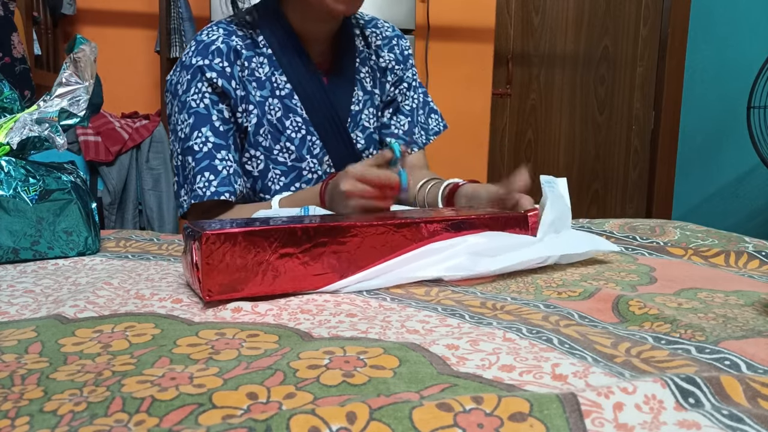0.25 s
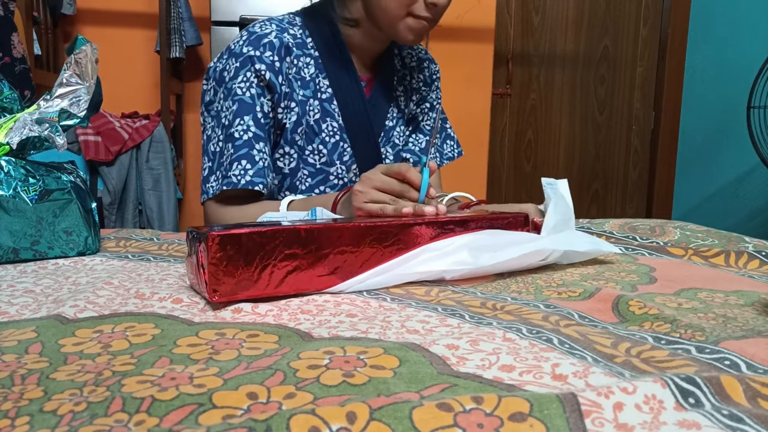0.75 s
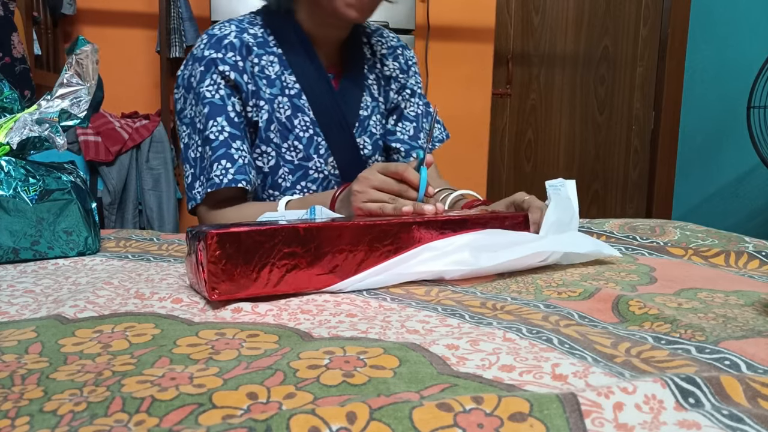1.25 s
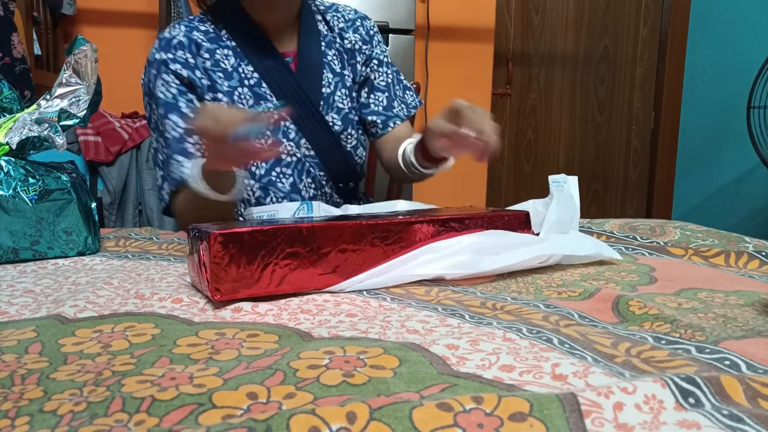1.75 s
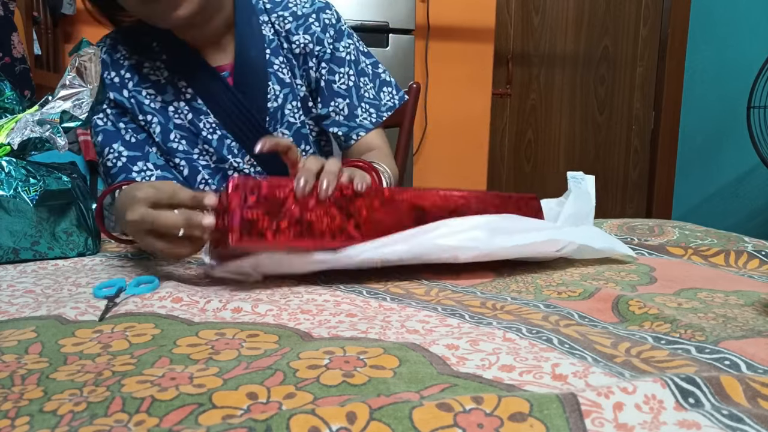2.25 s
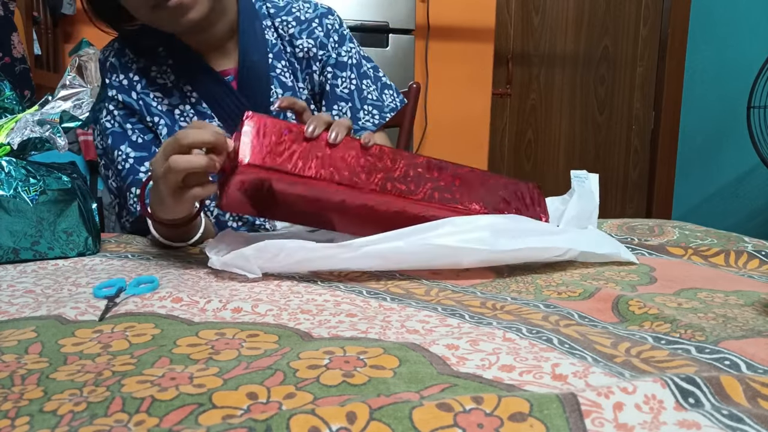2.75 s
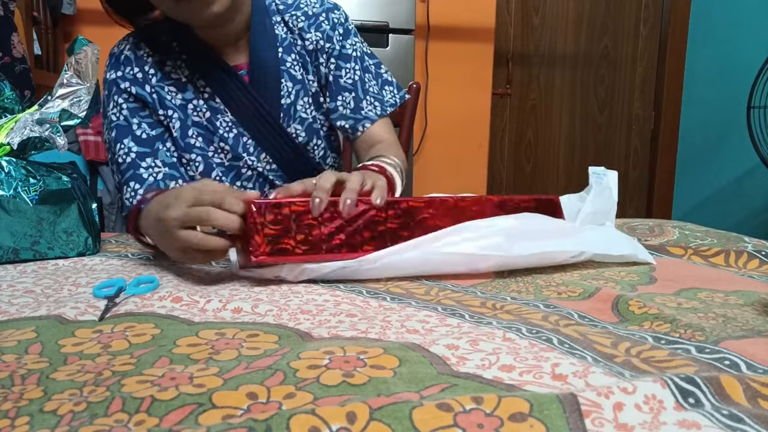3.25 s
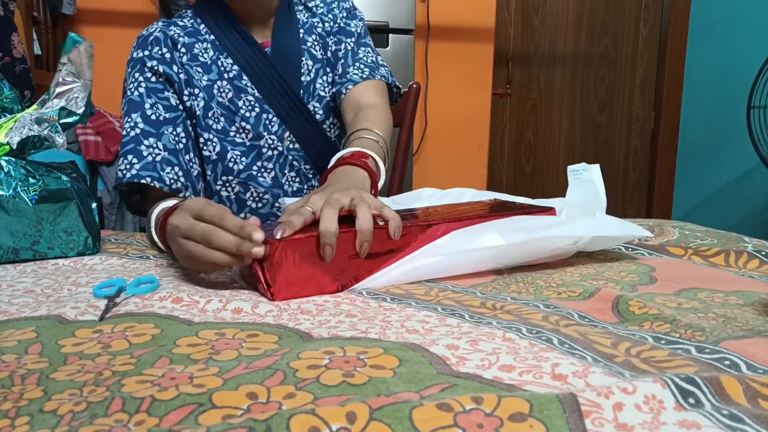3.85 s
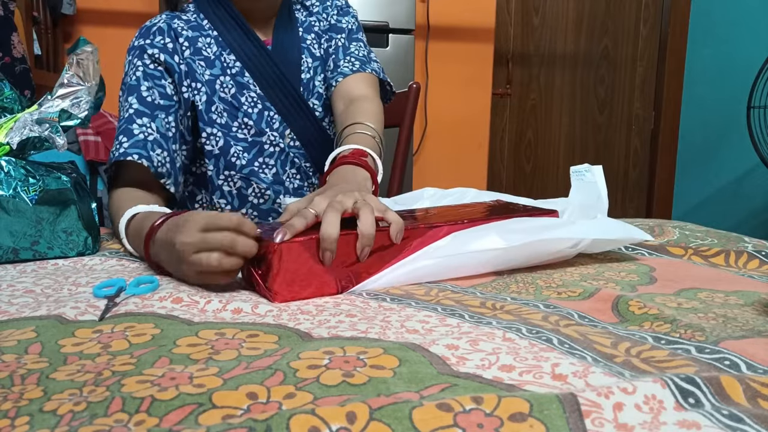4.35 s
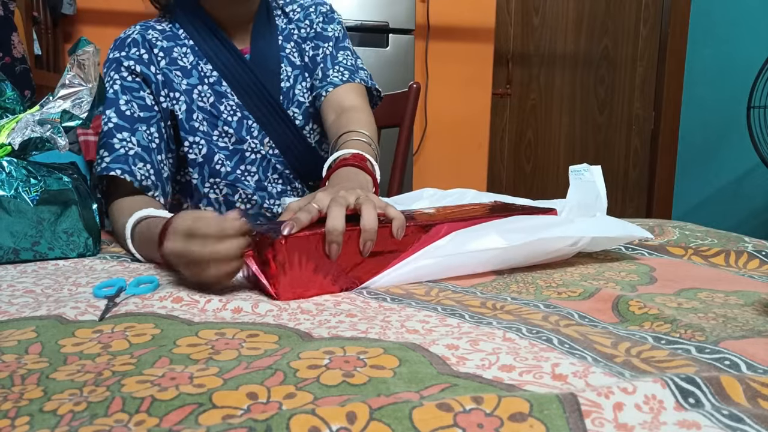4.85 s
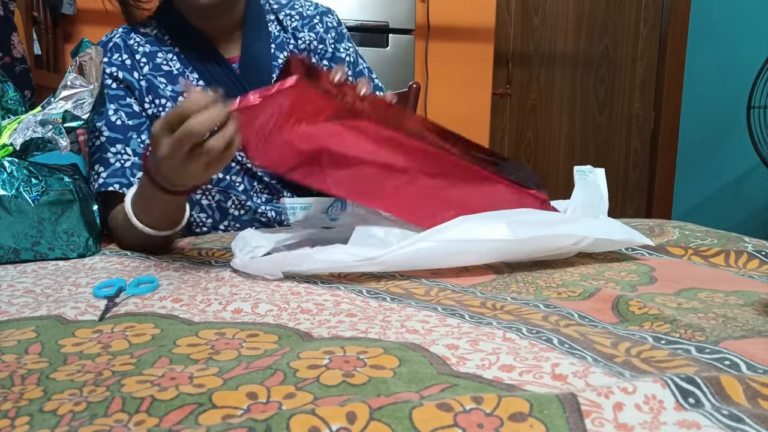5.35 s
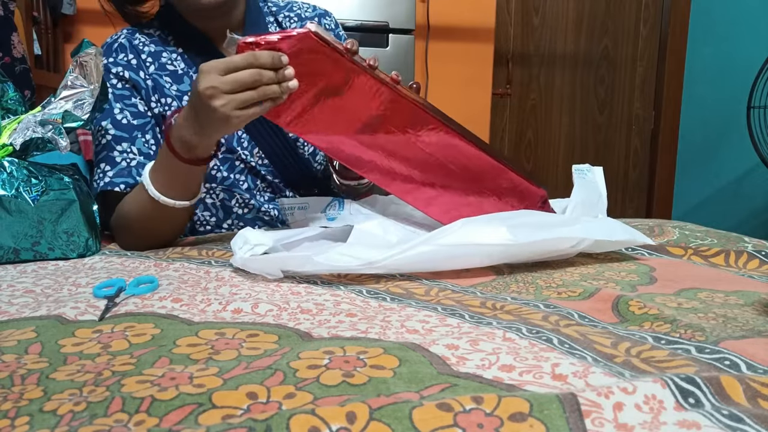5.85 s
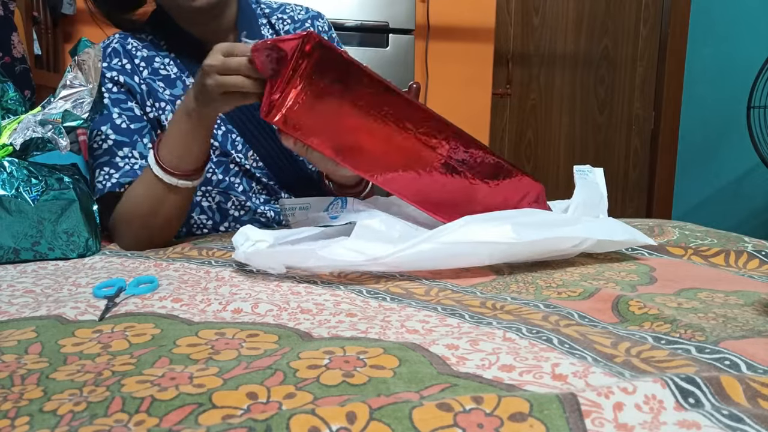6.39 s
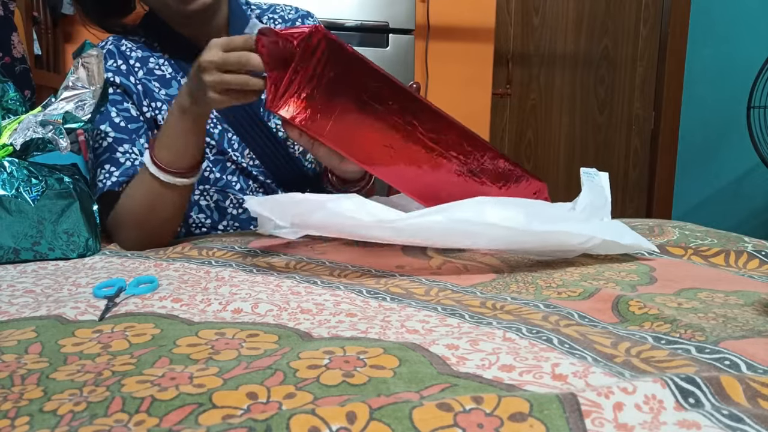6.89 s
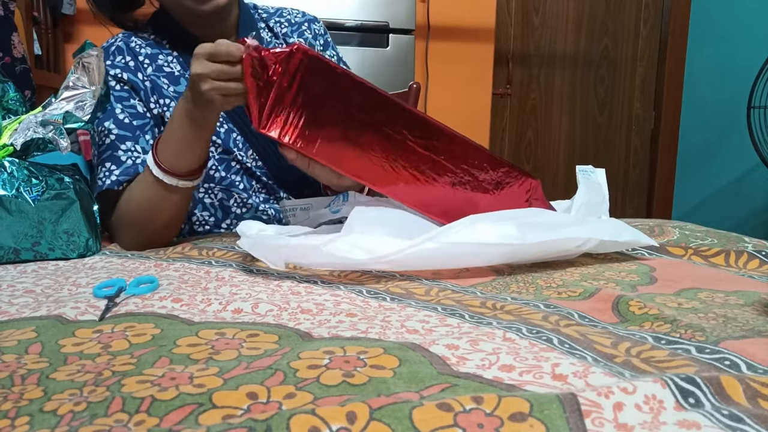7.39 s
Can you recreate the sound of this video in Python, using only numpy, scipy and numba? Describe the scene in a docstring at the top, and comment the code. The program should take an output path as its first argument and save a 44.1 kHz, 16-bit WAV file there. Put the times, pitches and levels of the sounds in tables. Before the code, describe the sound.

In a small room, someone unwraps a cardboard box covered in foil paper, close to the microphone. First come scissor snips and crinkling, then faint rustles, then sharp snaps of tape and foil and a longer run of crackly peeling. The box gives light hollow knocks as it is handled. Underneath, a fan hums steadily and its moving air buffets the microphone with soft, uneven thumps.

```python
"""Foil gift wrap rustles and snaps as it is snipped, picked at and peeled off a hollow cardboard box.
Each crease that buckles radiates a click; thousands merge into the rustle, and blows excite the damped
modes of the box in soft knocks. The box lies on a bed in a small room, a metre from a phone. A fan hums,
and the turbulence of its draught buffets the two microphone ports (0 left, 1 right)."""
import sys
import numpy as np
from scipy import signal
from scipy.fft import rfft, irfft, next_fast_len
from scipy.io import wavfile
from scipy.ndimage import uniform_filter1d
from numba import njit

SR = 44100
rng = np.random.default_rng(int(sys.argv[2]) if len(sys.argv) > 2 else 0)


def master(y):
    """Save y as 16-bit WAV."""
    cut = np.clip(np.atleast_2d(y).T, -1, 1)
    pcm = np.round(cut * 32767)  # scale
    wavfile.write(sys.argv[1], SR, pcm.astype(np.int16))


N = 336218


def undb(db):
    """Amplitude ratio of a level in decibels."""
    return 10 ** (np.asarray(db) / 20)


def unit(x):
    """Normalisation to an rms of 1."""
    return x / np.sqrt(np.mean(x ** 2))


def curves(table):
    """Linear interpolation of a time table's columns, one value a sample."""
    times, *columns = np.transpose(table)
    return [np.interp(np.arange(N) / SR, times, column) for column in columns]


def over_pitch(table, hz):
    """Interpolation of a (frequency_hz, value) table on a logarithmic frequency axis."""
    knots_hz, values = np.transpose(table)
    return np.interp(np.log(np.maximum(hz, 1)), np.log(knots_hz), values)


def add(out, sound, start_s):
    """Superposition of a short sound on a longer one."""
    i = max(int(start_s * SR), 0)
    n = min(len(sound), N - i)
    out[i:i + n] += sound[:n]


def walk(rate_hz):
    """Random modulation: held Gaussian values, smoothed twice."""
    hold = int(SR / rate_hz)
    steps = np.repeat(rng.standard_normal(N // hold + 1), hold)
    return 0.77 * uniform_filter1d(uniform_filter1d(steps, hold), hold)[:N]


@njit
def svf(x, hz, damping):
    """Second-order resonator with a moving centre and damping 1/Q: low, band and high outputs."""
    y, band_state, low_state = np.empty((3, len(x))), 0., 0.
    for i in range(len(x)):
        g = np.tan(np.pi * hz[i] / SR)
        band = (band_state + g * (x[i] - low_state)) / (1 + g * (g + damping))
        low = low_state + g * band
        band_state, low_state = 2 * band - band_state, 2 * low - low_state
        y[0, i], y[1, i], y[2, i] = low, damping * band, x[i] - damping * band - low
    return y


def tail(start_s, decay):
    """Diffuse impulse responses: decaying noise of unit energy, uncorrelated between the ports."""
    t = np.arange(12000) / SR
    noise = rng.standard_normal((2, len(t))) * (t > start_s) * decay(t)
    return noise / np.sqrt(np.sum(noise ** 2, axis=1, keepdims=True))


def spread(x, tails):
    """Convolution of one sound with an impulse response for each port."""
    return signal.fftconvolve(x[None], tails, axes=1)[:, :N]


def fan_hum(level_db=-59.5):
    """Partially coherent noise of fan and house: both ports share the low middle, which wavers."""
    # noise spectrum: frequency_hz, relative_density_db
    spectrum = [(35, 4), (60, 4.5), (380, 2), (924, -12.5), (1250, -7), (2190, -10.5), (3760, -19),
                (4220, -28), (5090, -18), (7400, -30), (9300, -20), (16000, -70)]
    # likeness of the two ports: frequency_hz, coherence (0 to 1)
    likeness = [(60, 0), (290, 1), (640, 0.24), (1400, 0.24), (3000, 0), (16000, 0.6)]
    size = next_fast_len(N)
    hz = np.fft.rfftfreq(size, 1 / SR)
    coherence = np.clip(over_pitch(likeness, hz), 0, 1)
    mid, side = (rfft(rng.standard_normal(size)) * undb(over_pitch(spectrum, hz)) for _ in range(2))
    pair = np.sqrt(1 + coherence) * mid + np.sqrt(1 - coherence) * side * np.array([[1], [-1]])
    low = irfft(pair / (1 + (hz / 600) ** 4), size)[:, :N]
    hum = irfft(pair, size)[:, :N] + (undb(2.5 * walk(20)) - 1) * low
    return unit(hum) * undb(level_db + 1.1 * walk(5.5))


def gust_levels(rise_db_per_s=550, fall_db_per_s=555, calm_db=-82):
    """Envelope in dB at each port: gusts grow exponentially, hold and decay to calm."""
    # gusts of the draught: start_s, length_s, level_db, port
    gusts = [(0, 0.008, -40, 1), (0, 0.024, -43.5, 0), (0.143, 0.039, -51, 0), (0.403, 0.031, -37.5, 1),
             (0.448, .11, -45, 1), (.54, 0.084, -55, 0), (0.857, 0.23, -43, 1), (0.907, .38, -55, 0),
             (1.421, 0.19, -42.5, 1), (1.495, 0.11, -51, 0), (1.685, 0.093, -43, 1), (1.753, .03, -54, 0),
             (1.93, .11, -41.5, 1), (2.239, .03, -50, 1), (2.36, 0.092, -46.5, 1), (2.358, 0.078, -54, 0),
             (2.529, 0.044, -48, 0), (2.526, 0.04, -41.5, 1), (2.607, 0.036, -49.5, 1),
             (2.674, 0.066, -54, 1), (2.866, 0.081, -44, 1), (2.905, .08, -53, 0), (3.053, 0.076, -37, 1),
             (3.11, 0.043, -50, 0), (3.35, 0.23, -43, 1), (3.43, 0.12, -53, 0), (3.78, 0.2, -52, 1),
             (4.006, 0.42, -59.5, 0), (4.165, 0.072, -54, 1), (4.312, 0.036, -37, 1),
             (4.616, 0.042, -41, 1), (4.713, 0.045, -46, 0), (4.891, 0.3, -39, 1), (5.104, 0.28, -50.5, 0),
             (5.353, 0.035, -39.5, 1), (5.5, 0.036, -37.5, 1), (5.58, 0.14, -51.5, 1), (5.6, 0.12, -55, 0),
             (6.033, 0.3, -38.5, 1), (6.143, .03, -56, 0), (6.378, .03, -54.5, 0), (6.456, 0.14, -44, 1),
             (6.737, 0.23, -41, 1), (7.102, 0.24, -39, 1), (7.173, 0.57, -51, 0), (7.4, 0.17, -37.5, 1)]
    t = np.arange(0, N + 64, 64) / SR
    start, length, held_db, port = np.transpose(gusts)[:, :, None]
    db = held_db - rise_db_per_s * np.maximum(start - t, 0)
    db -= fall_db_per_s * np.maximum(t - start - length, 0)
    right = port[:, 0] > .5
    levels = [np.maximum(db[side].max(0), calm_db) for side in (~right, right)]
    return curves(np.transpose([t, *levels]))


def draught(eddy_cycles=0.52, flutter_db=4.0):
    """Turbulent pressure rumbles on each port alone, higher in stronger gusts; lone eddies thump."""
    # eddies striking a port: centre_s, envelope_peak_db, pitch_hz, port
    eddies = [(0.385, -21, 106, 1), (0.439, -32, 132, 1), (0.464, -19.5, 142, 1), (0.51, -28, 132, 1),
              (1.44, -17, 162, 1), (1.506, -29, 91, 0), (1.526, -34, 111, 0), (1.551, -34, 97, 0),
              (1.57, -29.5, 89.5, 0), (1.717, -26.5, 84, 1), (1.752, -33, 96, 0), (2.904, -23, 109, 1),
              (2.968, -37, 70.5, 0), (3.057, -24.5, 108, 1), (3.092, -19.5, 124, 1), (3.41, -20, 88.5, 1),
              (3.433, -22, 129, 1), (3.473, -29.5, 105, 0), (3.538, -25.5, 124, 1), (3.563, -36, 85, 0),
              (3.583, -36, 99, 0), (3.816, -28.5, 100, 1), (4.221, -34, 113, 0), (4.54, -24.5, 124, 1),
              (4.614, -21, 96.3, 1), (4.772, -23, 121, 1), (4.922, -26.5, 116, 1), (4.964, -23, 112, 1),
              (4.988, -27, 109, 1), (5.007, -28.5, 124, 1), (5.035, -16.5, 169, 1), (5.139, -27, 98, 1),
              (5.148, -29, 94, 0), (5.477, -23, 115, 1), (5.58, -25.5, 137, 1), (6.046, -25.5, 99, 1),
              (6.121, -23.5, 114, 1), (6.159, -22.5, 151, 1), (6.204, -31, 112, 1), (6.22, -22.5, 103, 1),
              (6.243, -26, 107, 1), (6.29, -18.5, 159, 1), (6.777, -23, 144, 1), (6.919, -24, 107, 1),
              (7.076, -25, 98, 1), (7.114, -30, 101, 1), (7.16, -28.5, 97.5, 1), (7.181, -33, 119, 1),
              (7.277, -19.5, 153, 1), (7.323, -32, 108, 1), (7.42, -24.5, 112, 1), (7.487, -20, 157, 1),
              (7.517, -22, 100, 1), (7.523, -39, 81, 0), (7.595, -30.5, 132, 1), (7.607, -36.5, 72.6, 0)]
    out = np.zeros((2, N))
    for port, db in enumerate(gust_levels()):
        hz = np.clip(85 * undb(0.16 * (db + 50)), 30, 300)
        band = svf(rng.standard_normal(N), hz, 0.43)[1]
        rumble = svf(band, 1.674 * hz, 2.05)[0]
        out[port] = unit(rumble) * undb(db + flutter_db * walk(30))
    t = np.arange(-1500, 1500) / SR
    for (centre_s, db, hz, port), phase in zip(eddies, rng.random(len(eddies))):
        thump = np.exp(-(t * hz / eddy_cycles) ** 2) * np.cos(2 * np.pi * (hz * t + phase))
        add(out[int(port)], undb(db) * thump, centre_s + t[0])
    return out


def room(x):
    """Reverberation: diffuse reflections decay exponentially in each octave, the treble fastest."""
    # reverberation time: frequency_hz, t60_s
    decay_times = [(300, .2), (2000, .2), (9000, .15), (16000, .11)]
    tails = 0
    for hz in 350 * 2. ** np.arange(6):
        t60 = over_pitch(decay_times, hz)
        octave = signal.butter(2, [hz / np.sqrt(2), hz * np.sqrt(2)], "band", fs=SR, output="sos")
        tails += signal.sosfilt(octave, tail(0.00405, lambda t: np.exp(-np.log(1000) * t / t60)))
    return spread(x, tails)


def wall(x, delay_s=.0048):
    """Specular reflection off a near wall, reaching the right port 9 samples after the left."""
    return np.array([np.roll(x, int(delay_s * SR) + skew) for skew in (0, 9)])


def direct(x):
    """Time and level differences between the ports place the direct sound where the hands work."""
    # bearing of the hands: time_s, left_lag_samples, left_minus_right_db
    bearing = [(0, -1.5, 5.5), (3.6, -1, -1), (4.1, 6.5, -6.5), (5.3, 7, 1), (7.62, 6.5, -0.5)]
    lag, pan_db = curves(bearing)
    left = np.interp(np.arange(N) - lag, np.arange(N), x)
    return np.array([left, x]) * undb([pan_db / 2, -pan_db / 2])


def box_knocks(push_s=.011, thud_db=-5.0, thud_s=.01):
    """Modal response of the box: a blow rings the modes near its pitch over a dull thud."""
    # blows on the box: start_s, peak_db, pitch_hz
    knocks = [(0.582, -31.5, 790), (0.595, -40, 320), (0.588, -37, 660), (0.61, -41, 840),
              (0.635, -42.5, 840), (0.66, -48, 850), (2.75, -51, 700), (2.847, -53, 330), (3.292, -47, 335),
              (3.436, -42, 336), (4.3005, -26, 940), (4.308, -39.5, 333), (4.895, -42, 1760),
              (4.932, -41, 1180), (5.678, -43.5, 600), (5.692, -39, 574), (5.739, -41.5, 596),
              (5.757, -50, 650), (5.797, -39, 574), (5.9, -51, 330), (6.07, -41.5, 324), (6.277, -46, 330),
              (6.487, -48.5, 332), (6.745, -45, 330), (7.257, -40, 330), (7.371, -26, 1140),
              (7.38, -34, 610), (7.395, -36, 336), (7.429, -46.5, 330), (7.476, -43, 327)]
    # modes of the hollow box: frequency_hz, level_db, t60_s
    modes = [(255, -4, .09), (328, 0, .1), (615, 0, .07), (680, -4, .05), (845, -1, .06), (1150, -2, .09),
             (1350, -3, .08), (1760, -4, .07), (2250, -4, .06)]
    out, t = np.zeros(N), np.arange(9000) / SR
    hz, mode_db, t60 = np.transpose(modes)[:, :, None]
    soft_bumps = [(start_s, -53, 330) for start_s in rng.random(22) * N / SR]
    blows = knocks + soft_bumps
    scatter = rng.standard_normal((len(blows), 2, len(modes), 1))
    noises = rng.standard_normal((len(blows), len(t)))
    for (start_s, db, blow_hz), (scatter_db, detune), noise in zip(blows, scatter, noises):
        width_octaves = .3 * blow_hz / 600 + .1  # harder, higher blows excite more modes
        share = undb(mode_db + scatter_db) * np.exp(-(np.log2(hz / blow_hz) / width_octaves) ** 2)
        ring = share * np.exp(-np.log(1000) * t / t60) * np.sin(2 * np.pi * hz * (1 + .025 * detune) * t)
        thud = svf(noise * np.exp(-t / thud_s), np.full(len(t), 1.2 * blow_hz), 1.)[1] * blow_hz / 200
        rise_s = push_s * (hz[1] / blow_hz) ** 2  # low blows are soft pushes that swell slowly
        knock = (ring.sum(0) + undb(thud_db) * thud) * (1 - np.exp(-(t / rise_s) ** 2))
        add(out, knock * undb(db) / np.abs(knock).max(), start_s)
    return out


def foil_snaps(damping=.8):
    """Impulsive excitation: each snap is a noise burst that rings briefly in the sheet."""
    # snaps of foil, tape and blades: start_s, peak_db, pitch_hz, burst_s
    snaps = [(0.011, -23, 12600, 0.0021), (0.104, -15.5, 5600, 0.0023), (0.5778, -19, 4890, 0.0009),
             (0.5868, -27, 2520, 0.0014), (0.5925, -15.5, 3530, 0.0012), (0.9263, -41, 5700, 0.0014),
             (1.1653, -32, 5200, 0.00075), (1.3472, -32, 2910, 0.00028), (2.101, -48, 12100, 0.00098),
             (3.6865, -46, 12500, 0.0012), (3.994, -42.5, 11800, 0.00088), (4.2364, -37, 11900, 0.0033),
             (4.269, -34, 11100, 0.0011), (4.293, -32, 11500, 0.00072), (4.303, -11.5, 5700, 0.0003),
             (4.3027, -18.5, 2380, 0.002), (4.4772, -45, 12000, 0.0013), (4.5149, -33.5, 6650, 0.0015),
             (4.677, -52, 8050, 0.00058), (4.6982, -35.5, 8900, 0.00067), (4.864, -27, 11900, 0.00034),
             (4.8775, -21, 12500, 0.00024), (4.88, -19, 11000, 0.0003), (4.8855, -30, 11000, 0.0003),
             (4.892, -15, 10100, 0.0004), (4.896, -26, 10100, 0.0003), (4.9025, -19, 12000, 0.0003),
             (4.9376, -19, 5300, 0.00042), (5.1375, -35, 12300, 0.0011), (5.3282, -29.5, 5400, 0.0011),
             (5.339, -21.5, 5560, 0.0017), (5.623, -35, 11800, 0.00091), (5.6889, -20, 4770, 0.00037),
             (5.735, -26, 4430, 0.0021), (5.7952, -20, 3250, 0.00099), (6.0126, -35, 2680, 0.0011),
             (6.48, -36, 3440, 0.0011), (6.5642, -20, 6700, 0.0019), (7.261, -26.5, 11400, 0.0012),
             (7.285, -26.5, 10200, 0.002), (7.3452, -22.5, 11800, 0.0014), (7.3704, -14, 2970, 0.001),
             (7.4708, -25, 5560, 0.0012)]
    out, t = np.zeros(N), np.arange(1500) / SR
    for (start_s, db, hz, burst_s), noise in zip(snaps, rng.standard_normal((len(snaps), len(t)))):
        burst = noise * (t / burst_s) * np.exp(-t / burst_s * 2)
        ring_hz = np.full(len(t), float(hz))
        ring = svf(burst, ring_hz, damping)[1]
        snap = svf(ring + .4 * burst, .42 * ring_hz, 1.4)[2]
        add(out, snap * undb(db) / np.abs(snap).max(), start_s)
    return out


def crumpling(span_db=24.5, roundness=1.285, rest_db=-88):
    """Incoherent crumples add in power: their total level and power-weighted reach and tilt."""
    # crumples of the foil: peak_s, level_db, rise_s, fall_s, reach_octaves (below 8 kHz), tilt_db
    crumples = [(0.022, -46, .06, 0.054, 0.54, -8), (0.107, -40.5, 0.019, 0.091, 2.1, -5),
                (0.287, -56, 0.9, 0.1, 2.7, -1.5), (0.471, -54, 0.15, 0.39, 3.7, -1.5),
                (0.585, -32.5, 0.021, 0.14, 2.3, -3), (0.88, -54, 0.21, 0.18, 2.8, -1),
                (0.933, -41, 0.023, 0.058, 1.08, -2.5), (1.08, -47, 0.1, 0.053, 2.75, 0),
                (1.18, -43, 0.033, 0.071, 3.5, -2), (1.27, -55, 0.24, .1, 3.7, -1.5),
                (1.348, -50, 0.16, 0.13, 2, -3), (1.599, -58, 0.1, 0.071, 3.4, -3.5),
                (1.664, -57, 0.11, 0.063, 2.7, 0), (2.107, -60.5, 0.014, 0.049, 2.3, 6.5),
                (2.212, -63, 0.031, 0.13, 2.2, 1), (2.467, -66, 0.31, 0.092, 2.6, -3),
                (2.681, -56.5, 0.068, 0.22, 0.59, -3.5), (3.11, -58.5, .05, 0.21, 0.67, -5),
                (3.305, -56, 0.043, 0.089, 3, -2.5), (3.456, -49, 0.092, 0.062, 2.33, -3),
                (3.53, -67.5, .1, 0.42, 2.2, -2.5), (3.689, -70.5, 0.045, 0.04, 3.2, 23),
                (3.831, -47.5, 0.084, 0.096, 3.1, 0), (3.99, -63.5, 0.18, 0.32, 1.8, -0.5),
                (4.243, -58.5, 0.015, .1, 6.1, 10), (4.29, -64.5, 0.14, .05, 2.9, -5),
                (4.306, -35, 0.017, 0.043, 5.9, -2), (4.45, -65.5, 0.035, 0.36, 0.75, 7.5),
                (4.518, -51.5, 0.025, 0.032, 3.2, -6.5), (4.681, -53.5, 0.013, 0.052, 2.3, 2.5),
                (4.87, -36, 0.01, .06, 1.1, 3.5), (4.897, -35, 0.03, 0.056, 2.73, 1),
                (5.066, -63, 0.03, 0.13, 2, 1.5), (5.171, -51, 0.094, 0.23, 4.8, 3),
                (5.334, -49, 0.041, 0.033, 0.48, 6), (5.358, -39, 0.039, 0.055, 2, -4.5),
                (5.502, -50.5, 0.088, 0.046, 1.6, -3), (5.631, -45, 0.026, 0.29, 1.65, -3.5),
                (5.69, -42, 0.03, 0.06, 1.6, -13), (5.744, -42.5, 0.12, 0.043, 1.8, -4),
                (5.798, -30.5, 0.0065, 0.027, 1.85, -4), (5.86, -63.5, 0.041, 0.13, 2, -13.5),
                (6.037, -48, 0.067, 0.084, 2, -4.5), (6.228, -51.5, 0.03, 0.05, 2.5, 1),
                (6.36, -59.5, 0.077, 0.45, 3, 1.5), (6.44, -56.5, .15, 0.21, 1.3, -2.5),
                (6.484, -47, 0.02, 0.087, 1.35, -9), (6.566, -32, 0.0047, 0.048, 0.76, -10.5),
                (6.635, -44.5, 0.12, 0.082, 2.2, -5), (6.92, -58, 0.044, 0.33, 0.51, -2),
                (7.04, -56, 0.14, 0.34, 2.6, 9), (7.2, -51.5, 0.44, 0.18, 0.86, -5),
                (7.291, -47, 0.097, 0.087, 0.88, -7.5), (7.35, -46, 0.015, 0.13, 1.82, -11.5),
                (7.377, -35, 0.0087, 0.09, 2.3, -10.5), (7.485, -45.5, 0.075, 0.036, 1.2, -4),
                (7.62, -50, .12, .1, 1.2, -1)]
    t = np.arange(0, N + 32, 32) / SR
    peak_s, db, rise_s, fall_s, reach, tilt_db = np.transpose(crumples)[:, :, None]
    from_peak = np.where(t < peak_s, (peak_s - t) / rise_s, (t - peak_s) / fall_s)
    power = undb(2 * np.maximum(db - span_db * from_peak ** roundness, -200))
    total = power.sum(0)
    level_db = 10 * np.log10(total + undb(2 * rest_db))
    colour = [(power * column).sum(0) / total for column in (reach, tilt_db)]
    return curves(np.transpose([t, level_db, *colour]))


def foil_rustle(patch_clicks_per_s=1100, spread_db=3.6, ring_db=-2.0, sheet_s=.004, sheet_db=3.5):
    """Buckling: tiny creases click, patches of foil ring at drifting pitches, wider folds reach lower."""
    level_db, reach_octaves, tilt_db = crumpling()
    creases = 0
    for patch_hz in (1650, 3300, 5050, 9000):
        strength = undb(spread_db * np.minimum(rng.exponential(size=N), 3.8))
        clicks = (rng.random(N) < patch_clicks_per_s / SR) * rng.standard_normal(N) * strength
        ring_hz = np.clip(patch_hz * 2 ** (.3 * walk(15)), 500, 16000)
        ring = svf(clicks, ring_hz, .15)[1]
        patch = unit(clicks) + undb(ring_db) * unit(ring) * np.sqrt(patch_hz / 8000)
        # each patch of the wide sheet scatters to the ports along its own paths
        scattered = spread(patch, tail(0., lambda t: np.exp(-t / sheet_s)))
        creases += direct(patch) + undb(sheet_db) * scattered
    cutoff_hz = np.clip(8000 * 2 ** -reach_octaves, 400, 9000)
    out = np.empty((2, N))
    for port, crackle in enumerate(unit(creases)):
        for _ in range(2):  # fourth-order high-pass
            crackle = svf(crackle, cutoff_hz, 1.24)[2]
        low, band, high = svf(crackle, np.full(N, 7000.), 1.44)
        out[port] = low * undb(-tilt_db) + 1.22 * band + high * undb(tilt_db)
    return out * undb(level_db + 2.2 * walk(90))


def scene(wall_db=-8, room_db=-7):
    """Superposition at the ports: foil and box, their reflections, the draught and the hum."""
    snaps, knocks, rustle = foil_snaps(), box_knocks(), foil_rustle()
    into_room = snaps + undb(-4) * knocks + undb(-3) * rustle[0]
    echoes = undb(wall_db) * wall(snaps) + undb(room_db) * room(into_room)
    return rustle + direct(snaps + knocks) + echoes + draught() + fan_hum()


def record(dry, bottom_hz=40, top_hz=15900):
    """Linear filtering: the treble is coloured, and the deepest bass and the top are cut."""
    # treble colour, a narrow dip near 4.3 kHz, softer around 7.5 kHz, brighter near 12 kHz:
    # centre_hz, width_hz, gain_db
    treble_colour = [(4350, 720, -4.5), (5600, 1400, -0.5), (7480, 2200, -3.5), (12370, 2660, 4.5)]
    size = next_fast_len(N)
    hz = np.fft.rfftfreq(size, 1 / SR)
    colour_db = sum(db / (1 + (2 * (hz - centre) / width) ** 2) for centre, width, db in treble_colour)
    coloured = irfft(rfft(dry, size) * undb(colour_db), size)[:, :N]
    trimmed = signal.sosfilt(signal.butter(2, bottom_hz, "high", fs=SR, output="sos"), coloured)
    return signal.sosfilt(signal.ellip(8, .2, 70, top_hz, fs=SR, output="sos"), trimmed)


dry = scene()
out = record(dry)
master(out)
```